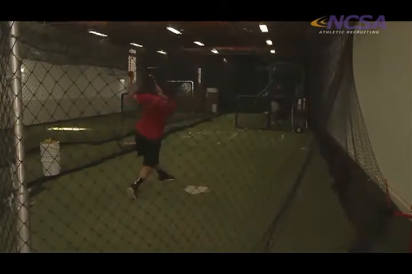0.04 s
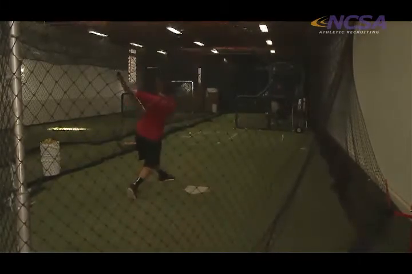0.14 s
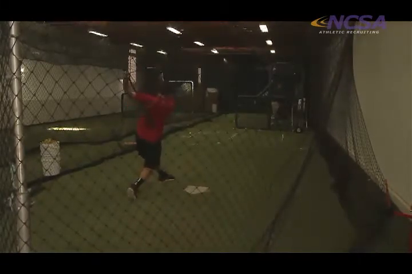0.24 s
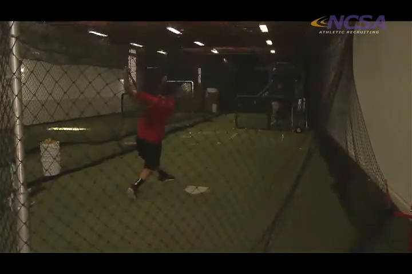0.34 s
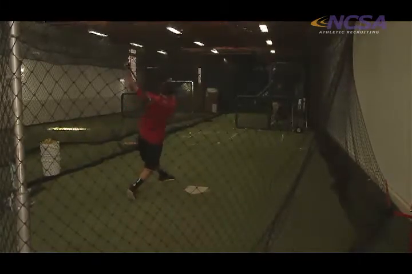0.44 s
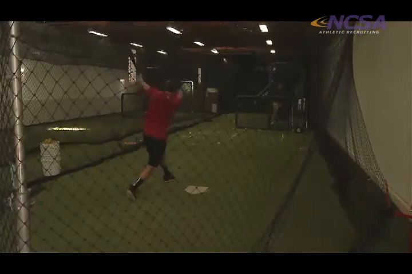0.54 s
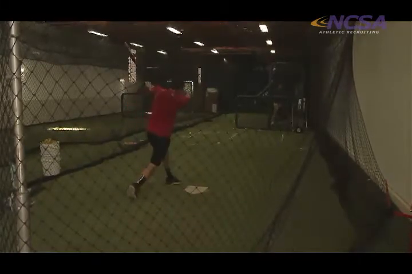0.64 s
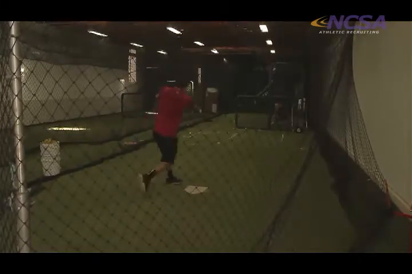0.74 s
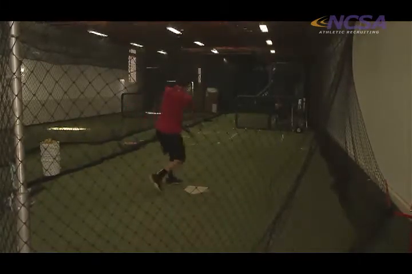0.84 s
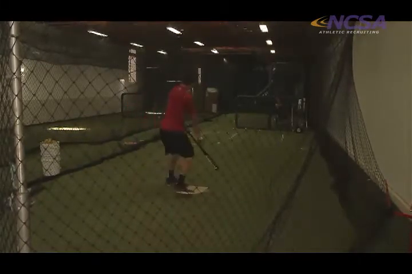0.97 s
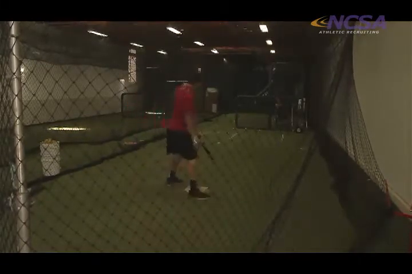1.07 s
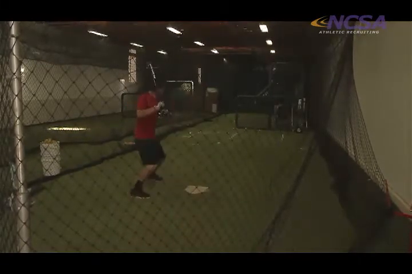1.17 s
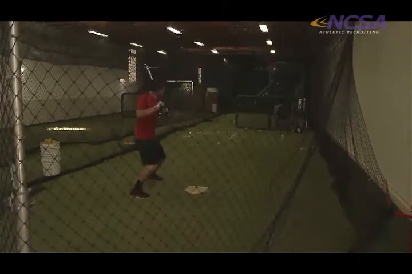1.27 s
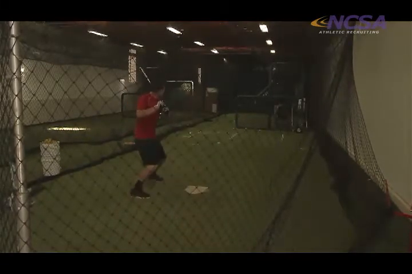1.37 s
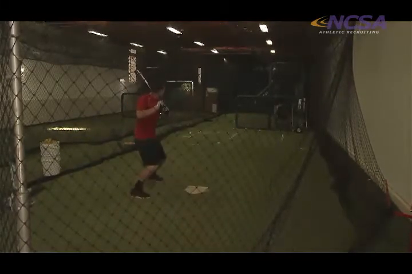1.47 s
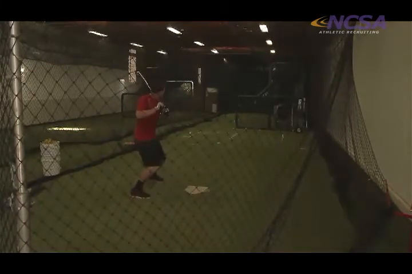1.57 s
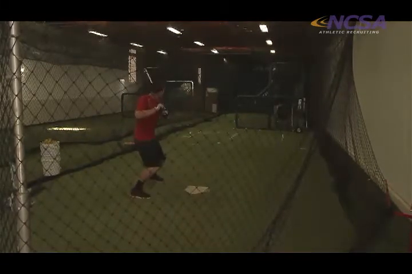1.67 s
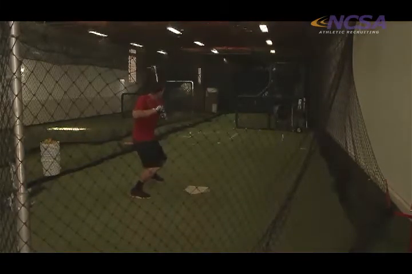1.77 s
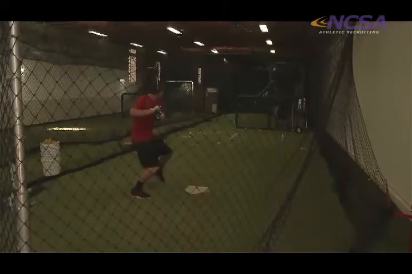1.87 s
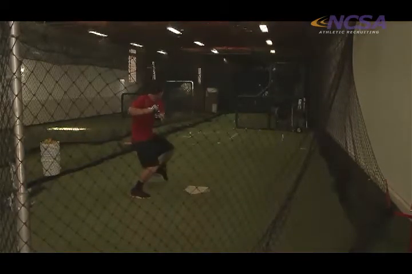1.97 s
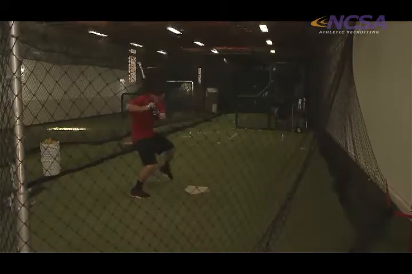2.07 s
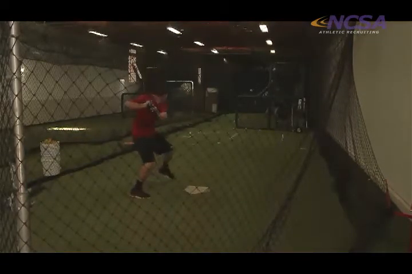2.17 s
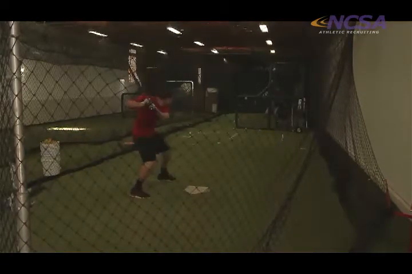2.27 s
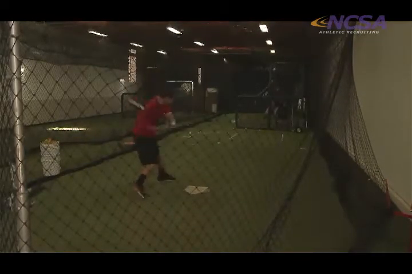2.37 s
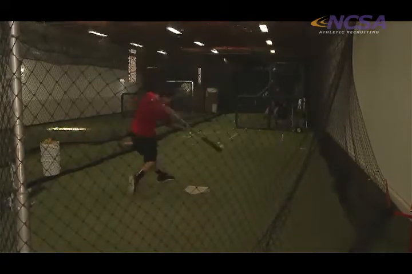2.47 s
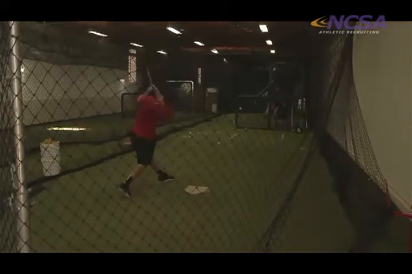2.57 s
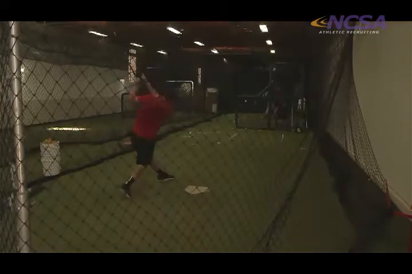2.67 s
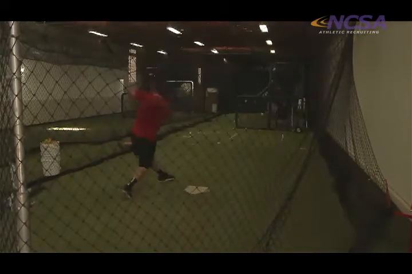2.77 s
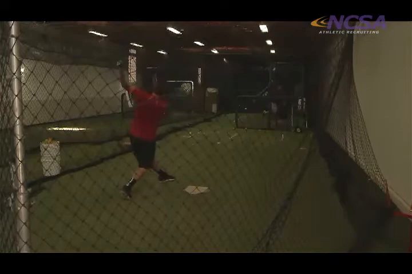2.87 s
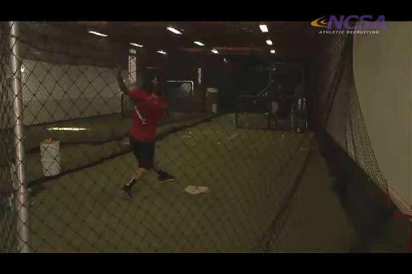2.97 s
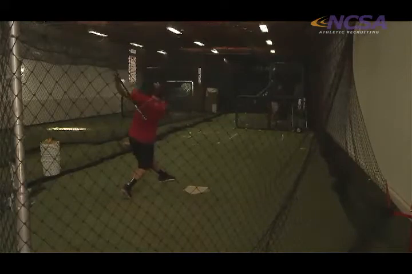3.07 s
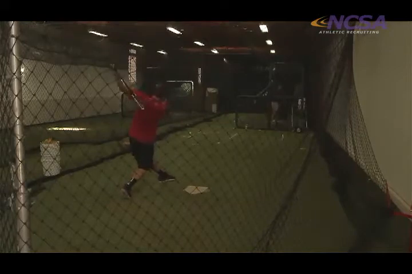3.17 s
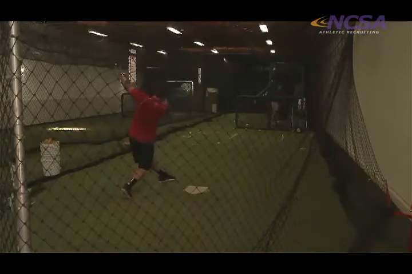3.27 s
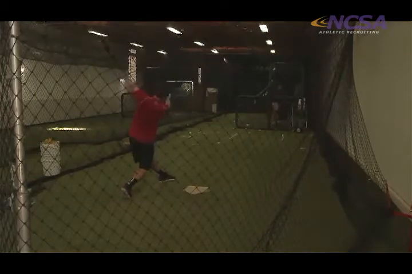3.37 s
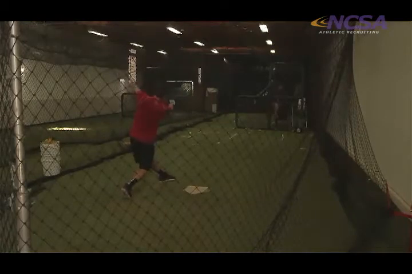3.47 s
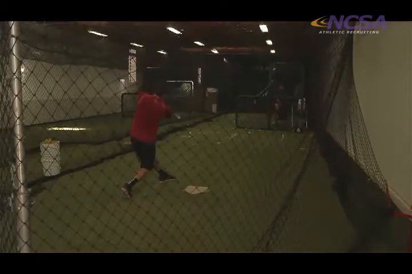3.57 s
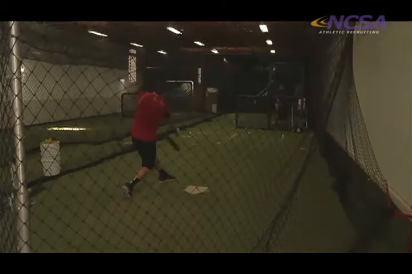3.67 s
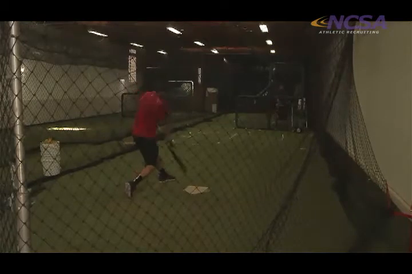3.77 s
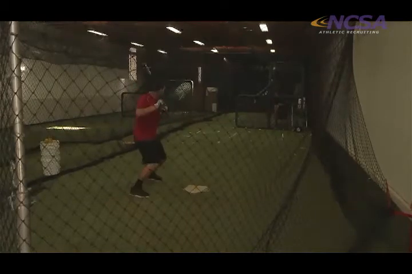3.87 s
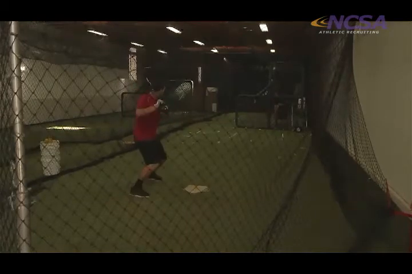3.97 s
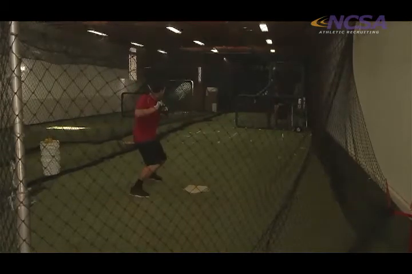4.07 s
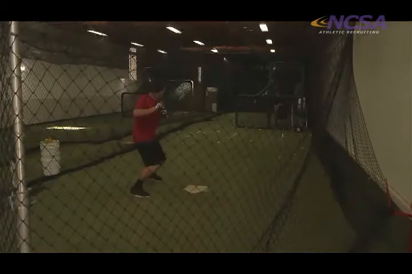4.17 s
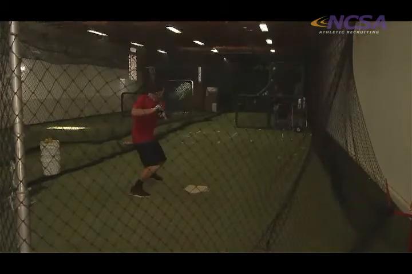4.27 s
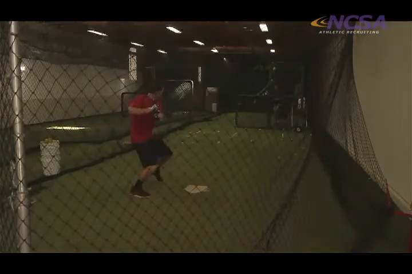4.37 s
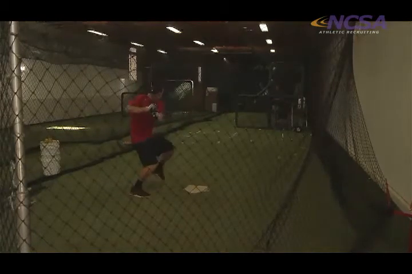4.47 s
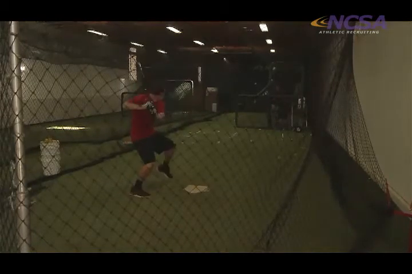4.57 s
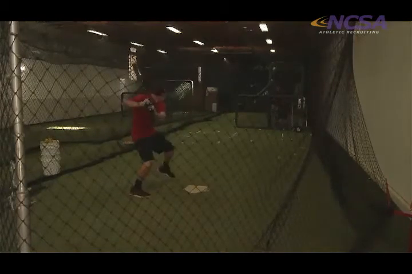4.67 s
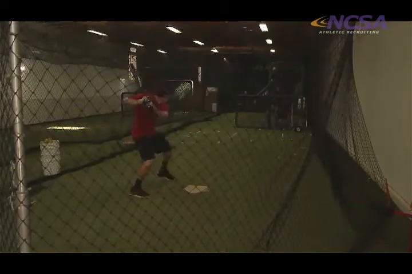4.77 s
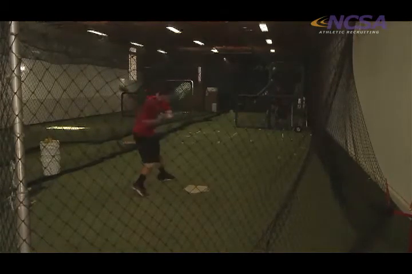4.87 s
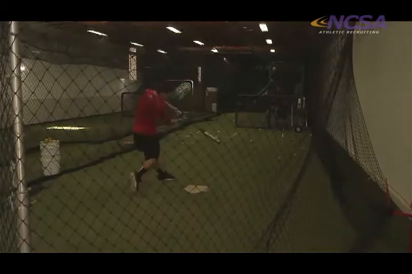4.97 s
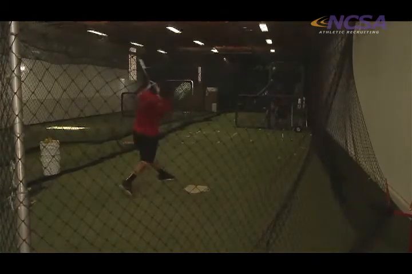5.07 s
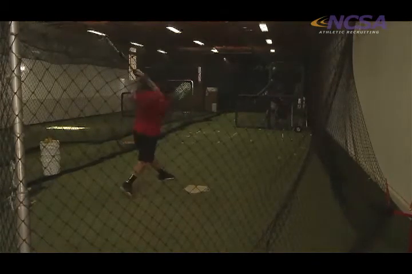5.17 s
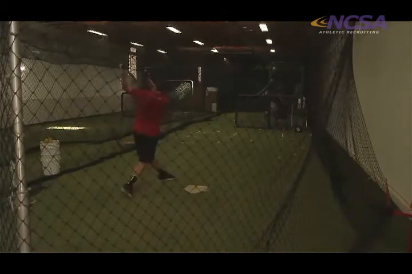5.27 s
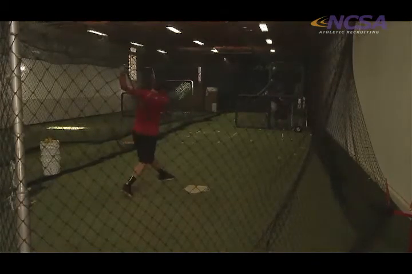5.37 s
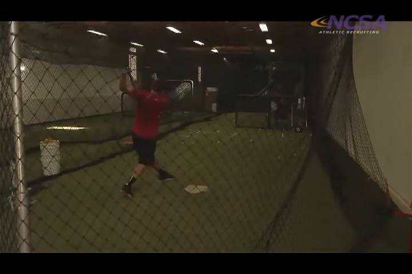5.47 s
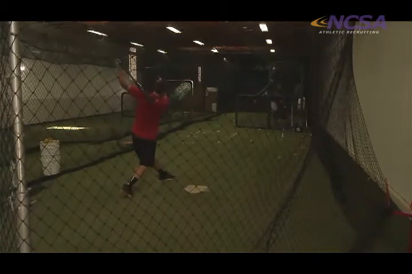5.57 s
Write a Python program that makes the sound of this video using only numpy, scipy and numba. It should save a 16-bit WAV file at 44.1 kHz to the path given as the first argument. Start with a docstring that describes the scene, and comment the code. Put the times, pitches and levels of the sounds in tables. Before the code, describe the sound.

A bat cracks against two baseballs in an echoing indoor cage, with soft thuds and net rustles over humming ventilation.

```python
"""A bat cracks against three pitched baseballs, the first just before the start, in a netted cage.
The bat rings; the hard walls of a large hall slap each crack back and let it hang. Swings rush,
the net shakes, and balls and feet thud over ventilation and a motor's hum.
The microphone is near enough to clip on the crack; its gain control ducks, then creeps back up
through the echoes."""
import sys
import numpy as np
from scipy import signal
from scipy.fft import rfft, irfft
from scipy.io import wavfile
from scipy.ndimage import uniform_filter1d
from numba import njit

SR = 44100
rng = np.random.default_rng(int(sys.argv[2]) if len(sys.argv) > 2 else 0)


def master(y):
    """Save y as 16-bit WAV."""
    cut = np.clip(np.atleast_2d(y).T, -1, 1)
    pcm = np.round(cut * 32767)  # scale
    wavfile.write(sys.argv[1], SR, pcm.astype(np.int16))


N = 248724
TIME = np.arange(N) / SR

# Bat meets ball. Each row: contact in seconds, then in dB the crack, its share thrown into the hall,
# the rush of the swing and the shaking of the net.
BAT_HITS = [(-0.2125, 13.5, -2.5, -26, -25), (2.5103, 15.5, -4, -20.5, -29), (5.0171, 15, 0, -24, -24.5)]


def crack(hit, contact_db=31.0, radiate_hz=280, size=12000):
    """The ball's sub-millisecond push and the bat's brief ring; a slim bat radiates little bass."""
    # Each row: a mode's pitch in Hz, t60 in seconds, dB in hits 1, 2 and 3 (set by the spot struck).
    bat_modes = [(1735, 0.019, -9, -4, -14), (2355, 0.075, -28, -12, -29), (2407, 0.069, -8.5, -2, -0.5),
                 (2611, 0.053, 1, -1, -9.5), (2799, .075, -7, -16.5, 2.5), (2890, 0.1, -18, -10.5, -11),
                 (3070, 0.02, 3, -11, 4), (3540, 0.072, -1.5, -27, 1.5), (3316, 0.038, -11, -28, -1.5),
                 (3710, 0.069, -6, -33, -4.5), (3616, 0.2, -13, -38, -5.5), (3780, .07, -10, -32, -8),
                 (3876, 0.064, -11, -29.5, -9.5)]
    # The ball's push. Each row: frequency in Hz, level in dB.
    contact_colour = [(60, -17), (200, -1), (450, -18), (900, 3.5), (1600, -2.5), (2500, 7.5), (3800, 0.5),
                      (4150, -15), (6000, -13.5), (10000, -24.5)]
    t = TIME[:size]
    ring = sum(amp(db[hit]) * np.sin(2 * np.pi * hz * t) * fade(t60)[:size] for hz, t60, *db in bat_modes)
    add(ring, amp(contact_db) * pulse(contact_colour), 0)
    return signal.sosfilt(signal.butter(2, radiate_hz, "high", fs=SR, output="sos"), ring)


def bat_hits(tail_db=-44, lumps_db=3, mixing_s=0.67, near_db=-39, echo_t60=0.92, wall_hz=5000):
    """Each crack reaches the microphone directly, off nearby fittings, off the walls and as a wash."""
    # Floor, side walls and ceiling, then the far end of the hall.
    # Each row: delay in seconds, level in dB relative to the echoes' decay.
    wall_echoes = [(.0046, -9), (0.014, -16.5), (.0455, -13), (.059, -16), (0.1034, -9), (.116, -13.5),
                   (.182, -8.5), (.335, -11), (.404, -9), (.44, -12.5), (.4555, -8), (.479, -10)]
    out = np.zeros(N)
    wall = signal.butter(2, wall_hz, fs=SR, output="sos")  # walls and netting dull each echo
    smear = amp(-21) * fade(t60=0.044)[:4000]  # beams and fittings scatter it
    for hit, (start, db, hall_db, *_) in enumerate(BAT_HITS):
        lumps = lumps_db * walk(90) * np.exp(-TIME / mixing_s)  # reflections crowd and even out
        paths = amp(tail_db + lumps) * hall_tail(build_s=0.091)
        paths += amp(near_db) * rng.standard_normal(N) * fade(t60=0.3)
        for delay, echo_db in wall_echoes:
            echo = smear * rng.standard_normal(len(smear))
            echo[0] += 0.56  # the mirror reflection
            add(paths, signal.sosfilt(wall, echo) * amp(echo_db - 60 * delay / echo_t60), delay)
        paths *= amp(hall_db)
        paths[0] += 1  # the direct sound
        add(out, amp(db) * signal.fftconvolve(crack(hit), paths)[:N], start)
    return out


def thuds(body_t60=0.021, slap_t60=0.04, tail_db=-50, boom_db=-33, boom_hz=450, low_cut_hz=110):
    """Soft blows: a few low cycles and a slap of fabric; the cage booms and the hall answers."""
    # Balls land in net and padding, feet on the turf.
    # Each row: start in seconds, level in dB, pitch in Hz, slap in dB relative to the blow.
    blows = [(0.0464, -13.5, 205, -2.5), (0.7694, -7, 278, -29), (0.808, -17.5, 229.7, -39),
             (2.256, -25.5, 237, -16), (2.766, -11.5, 205, 2.5), (3.154, -15, 310, -39),
             (3.625, -26, 232, -21), (4.358, -28, 170, -39), (4.812, -22.5, 176.6, -29),
             (5.2624, 1.5, 212, -1)]
    slap_colour = [(150, -12.5), (750, 7.5), (1300, 6), (2800, -9), (5000, -21.5), (10000, -32)]  # Hz, dB
    fabric = noise(slap_colour) * fade(slap_t60)
    out = np.zeros(N)
    for start, db, hz, slap_db in blows:
        body = np.sin(2 * np.pi * hz * TIME) * fade(body_t60)
        add(out, amp(db) * (body + amp(slap_db) * fabric), start)
    out = signal.sosfilt(signal.butter(2, low_cut_hz, "high", fs=SR, output="sos"), out)
    boom = signal.sosfilt(signal.butter(2, boom_hz, fs=SR, output="sos"), rng.standard_normal(N))
    boom *= fade(t60=0.42) * (1 - fade(t60=0.3))
    room = amp(tail_db) * hall_tail(build_s=.03) + amp(boom_db) * boom
    return out + signal.fftconvolve(out, room)[:N]


def net_rustle(flight_s=.253, shake_s=0.282, settle_s=0.011, jerks_db=3.0):
    """The net catches each ball after its flight: cords and hooks jerk about, then settle."""
    # Each row: frequency in Hz, level in dB.
    net_colour = [(60, -25), (160, 1.5), (300, -5.5), (650, 2), (1100, -6), (2200, -22), (5000, -16),
                  (10000, -39.5)]
    out = np.zeros(N)
    shaking = fade(t60=1.21) * (1 - np.tanh((TIME - shake_s) / settle_s)) / 2
    for contact, *_, net_db in BAT_HITS:
        rustle = noise(net_colour) * amp(net_db + jerks_db * walk(112.2))
        add(out, rustle * shaking, contact + flight_s)
    return out


def frame_clank(start_s=.0475, db=-3.5, t60=0.034):
    """The first ball clips the cage's frame: a short, hard knock on steel pipe."""
    # Each row: frequency in Hz, level in dB.
    pipe_colour = [(300, -20), (1200, -17), (1800, -2), (2600, 3), (3800, -1), (4500, -16), (10000, -36)]
    out = np.zeros(N)
    add(out, amp(db) * noise(pipe_colour) * fade(t60), start_s)
    return out


def swings(windup_s=0.256, windup_db=-48.5, swish_lead_s=0.07, swish_width_s=0.032, swish_db=-38,
           rise_db_per_s=286.5, fall_db_per_s=997, flutter_db=2.3):
    """The batter winds up, the barrel swishes round, and air rushes ever louder until contact."""
    # Air round the bat. Each row in both: frequency in Hz, level in dB.
    rush_colour = [(40, -17), (130, 10.5), (350, 1), (700, 1.5), (1300, -9), (3000, -14), (4500, -24.5),
                   (10000, -51)]
    swish_colour = [(100, -17), (400, 3.5), (850, 2), (1500, -3.5), (3000, -10), (4500, -22.5),
                    (10000, -41)]
    rush, swish = np.zeros(N), np.zeros(N)
    for contact, _, _, rush_db, _ in BAT_HITS:
        t = TIME - contact
        rush += amp(rush_db + np.minimum(rise_db_per_s * t, -fall_db_per_s * t))
        swish += amp(windup_db) * swell(contact - windup_s, contact, attack_s=0.036, release_s=.02)
        swish += amp(swish_db) * np.exp(-((t + swish_lead_s) / swish_width_s) ** 2)
    return (noise(rush_colour) * rush + noise(swish_colour) * swish) * amp(flutter_db * walk(70))


def scuffs(attack_s=0.18, flutter_db=2):
    """Shoes and clothes brush between swings."""
    # Each row: start and end in seconds, level in dB, release in seconds.
    brushes = [(0.977, 1.217, -49.5, 0.013), (1.82, 2.1, -56.5, 0.18)]
    # Each row: frequency in Hz, level in dB.
    brush_colour = [(200, 0), (1200, -1), (2200, -4), (3200, 0.5), (4300, -13), (10000, -32)]
    level = sum(amp(db) * swell(start, end, attack_s, release) for start, end, db, release in brushes)
    return noise(brush_colour) * level * amp(flutter_db * walk(50.16))


def squeak_and_whirr(flutter_hz=170):
    """Two short gliding tones: a faint, rough squeak, and a whirr as the last swing starts."""
    # Each row: start and length in seconds, first and last pitch in Hz, level in dB, roughness 0 to 1.
    glides = [(1.067, .17, 2940, 3260, -49, 0.94), (4.9, .056, 453, 407, -30, 0.12)]
    out = np.zeros(N)
    for start, length, from_hz, to_hz, db, rough in glides:
        hz = np.linspace(from_hz, to_hz, int(length * SR))
        tone = np.sin(2 * np.pi * np.cumsum(hz) / SR)
        flutter = 1 - rough + rough * walk(flutter_hz)[:len(hz)]
        add(out, amp(db) * flutter * np.hanning(len(hz)) * tone, start)
    return out


def pop(start_s=3.8945, db=-27, t60=0.33):
    """One soft, deep pop where the room tone dips for the second time."""
    out = np.zeros(N)
    add(out, amp(db) * fade(t60), start_s)
    return out


def motor(second_db=-9, third_db=-12, pitch_waver=0.0044, waver_db=-0.5):
    """A motor's wavering hum with two overtones comes and goes."""
    # Each row: start and end in seconds, pitch in Hz, rms level of the fundamental in dB.
    hum_spells = [(-.1, 1.195, 93.8, -43), (1.393, 1.735, 88.2, -46), (1.825, 2.45, 87.3, -51.5),
                  (3.18, 3.878, 86.35, -50.5)]
    out = np.zeros(N)
    for start, end, hz, db in hum_spells:
        phase = 2 * np.pi * np.cumsum(hz * (1 + pitch_waver * walk(7.4))) / SR
        tone = np.sin(phase) + amp(second_db) * np.sin(2 * phase) + amp(third_db) * np.sin(3 * phase)
        out += np.sqrt(2) * amp(db) * tone * swell(start, end, attack_s=.12, release_s=.06)
    return out * amp(waver_db * walk(5.6))


def room_tone(air_db=-44.5, drift_db=.6, hiss_db=-63, hiss_dip_share=0.55):
    """The hall's ventilation and the microphone amplifier's hiss; the background drops abruptly between swings,
    then recovers."""
    # Each row in both: frequency in Hz, level in dB.
    ventilation_colour = [(15, -35.5), (25, -15.5), (65, -1), (188, -6), (371, -13), (395, -12.5),
                          (555, -13), (631, -14), (867, -10.5), (1030, -13), (2300, -26.5), (2670, -26),
                          (4000, -31), (5200, -67), (8800, -120)]
    hiss_colour = [(100, -7), (2000, -11), (5000, 4.5), (10000, -0.5)]
    # Each row: start in seconds, dip in dB, recovery time constant in seconds.
    dips = [(1.224, -3.5, 1.1), (3.9, -10, 0.2)]
    dip_db = sum(db * (TIME >= start) * np.exp(-np.abs(TIME - start) / recovery)
                 for start, db, recovery in dips)
    air = noise(ventilation_colour) * amp(air_db + dip_db + drift_db * walk(10))
    return air + noise(hiss_colour) * amp(hiss_db + hiss_dip_share * dip_db)


def hall_tail(build_s):
    """The hall's diffuse reverberation builds up, then each band dies at its own rate."""
    # Each row: band centre in Hz, t60 in seconds.
    hall_decay = [(100, 2.1), (400, 0.59), (1200, 1.2), (2700, 1.17), (4000, 1.125), (6000, 0.77),
                  (10000, 0.57)]
    spectrum, hz = rfft(rng.standard_normal(N)), np.fft.rfftfreq(N, 1 / SR)
    centres, t60s = np.transpose(hall_decay)
    bands = (irfft(spectrum * on_log_axis(np.c_[centres, share], hz), N) for share in np.eye(len(t60s)))
    return sum(band * fade(t60) for band, t60 in zip(bands, t60s)) * (1 - np.exp(-TIME / build_s))


def amp(db):
    """Decibels to gain."""
    return 10 ** (np.asarray(db) / 20)


def on_log_axis(points, hz):
    """Read (Hz, value) points at any frequency."""
    f, value = np.transpose(points)
    return np.interp(np.log(np.maximum(hz, 1)), np.log(f), value)


def fade(t60):
    """Exponential decay, 60 dB down after t60 seconds."""
    return np.exp(-np.log(1000) * TIME / t60)


def swell(start, end, attack_s, release_s):
    """Attack, hold until the end, release."""
    return np.clip((TIME - start) / attack_s, 0, 1) * np.clip(1 - (TIME - end) / release_s, 0, 1)


def add(out, sound, start):
    """Mix a sound in at a time in seconds, which may be negative."""
    i = int(round(start * SR))
    first, last = max(i, 0), min(i + len(sound), len(out))
    if last > first:
        out[first:last] += sound[first - i:last - i]


def noise(colour):
    """Noise of unit rms with a (Hz, dB) spectrum."""
    gain = amp(on_log_axis(colour, np.fft.rfftfreq(N, 1 / SR)))
    x = irfft(rfft(rng.standard_normal(N)) * gain, N)
    return x / x.std()


def walk(rate_hz):
    """A random wander of unit spread."""
    step = int(SR / rate_hz)
    x = uniform_filter1d(np.repeat(rng.standard_normal(N // step + 1), step), step)[:N]
    return x / x.std()


def pulse(colour, size=1024):
    """The shortest causal pulse with a (Hz, dB) spectrum."""
    gain = amp(on_log_axis(colour, np.fft.rfftfreq(size, 1 / SR)))
    cepstrum = irfft(np.log(gain))
    cepstrum[1:size // 2] *= 2
    cepstrum[size // 2 + 1:] = 0
    return irfft(np.exp(rfft(cepstrum)))


def scene():
    """Everything that reaches the microphone, in mono."""
    batting = bat_hits() + thuds() + net_rustle() + frame_clank() + swings() + scuffs()
    return (batting + squeak_and_whirr() + room_tone() + motor() + pop())[None]


def overload(x, limit_db=21.5, bias=.15):
    """The microphone saturates on the crack, a little more on one side of the wave."""
    limit = amp(limit_db)
    oversampled = signal.resample_poly(x, 4, 1)
    bent = limit * (np.tanh(oversampled / limit + bias) - np.tanh(bias))
    return signal.resample_poly(bent, 1, 4)


@njit
def gain_control(x, threshold=0.34, attack_db_per_s=4300, release_db_per_s=42, start_db=-15.5):
    """Ducks fast over the threshold and creeps back to unity; it starts ducked by the first crack."""
    attack = 10 ** (-attack_db_per_s / SR / 20)
    release = 10 ** (release_db_per_s / SR / 20)
    gain = 10 ** (start_db / 20)
    out = np.empty(len(x))
    for i in range(len(x)):
        out[i] = x[i] * gain
        gain = gain * attack if abs(out[i]) > threshold else min(gain * release, 1.)
    return out


def record(dry, ceiling=.45, top_hz=10400):
    """The microphone chain: the crack outruns the gain control and clips; the top is cut."""
    ducked = gain_control(overload(dry[0]))
    oversampled = signal.resample_poly(ducked, 4, 1)
    clipped = signal.resample_poly(np.clip(oversampled, -ceiling, ceiling), 1, 4)
    low_pass = signal.firwin(161, top_hz, fs=SR, window=("kaiser", 7))
    return signal.fftconvolve(clipped, low_pass, "same")[None]


dry = scene()
out = record(dry)
master(out)
```